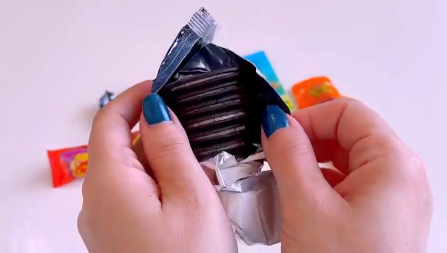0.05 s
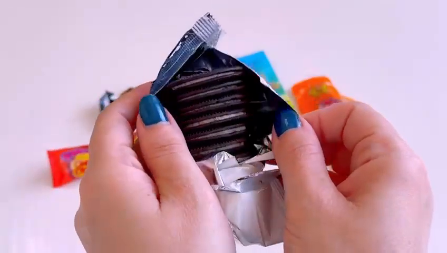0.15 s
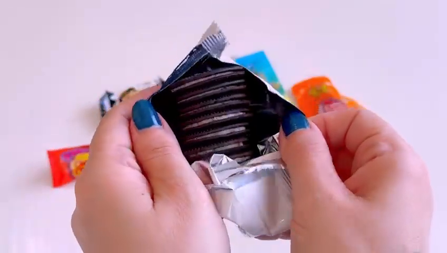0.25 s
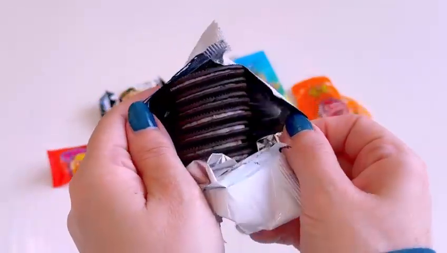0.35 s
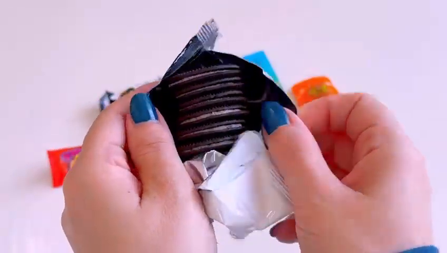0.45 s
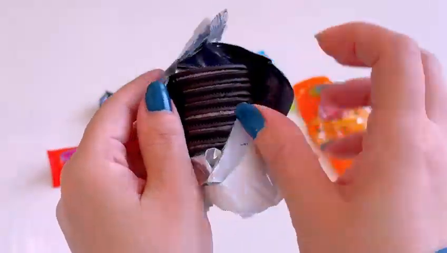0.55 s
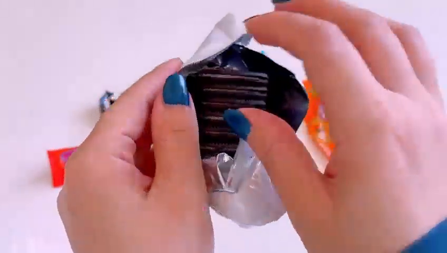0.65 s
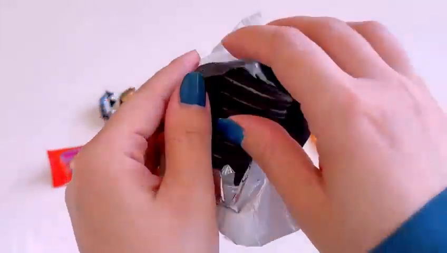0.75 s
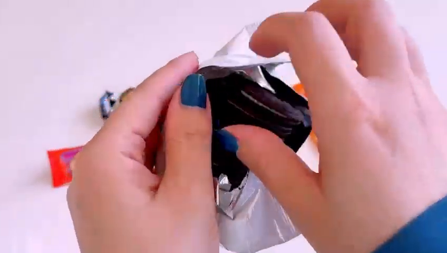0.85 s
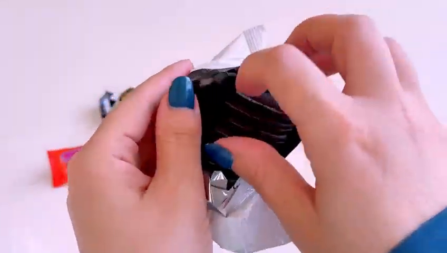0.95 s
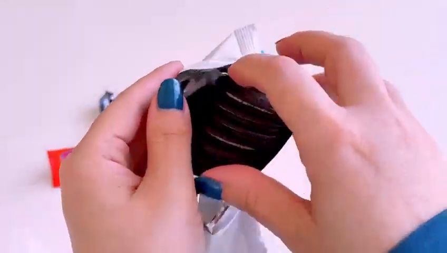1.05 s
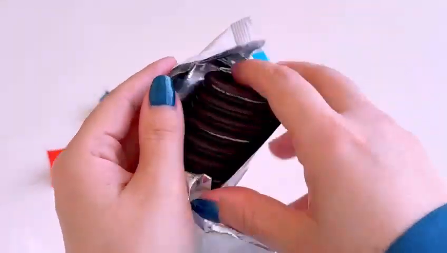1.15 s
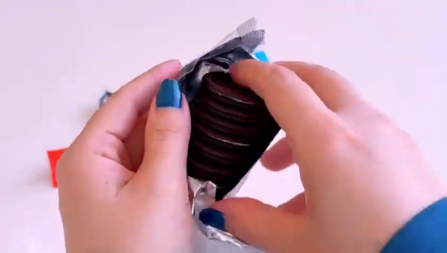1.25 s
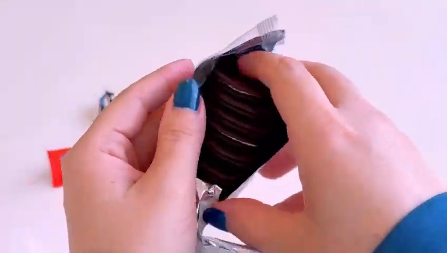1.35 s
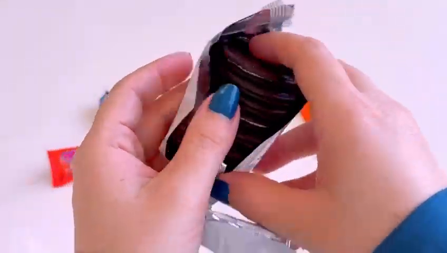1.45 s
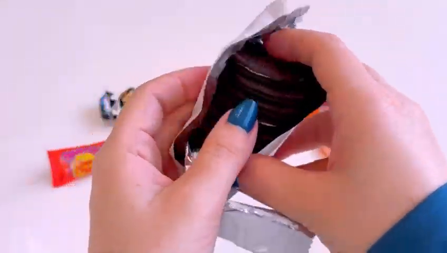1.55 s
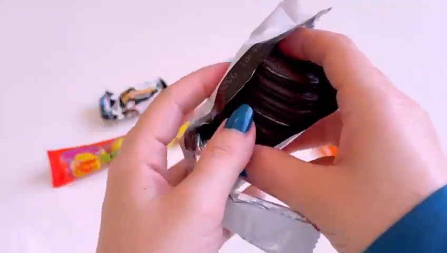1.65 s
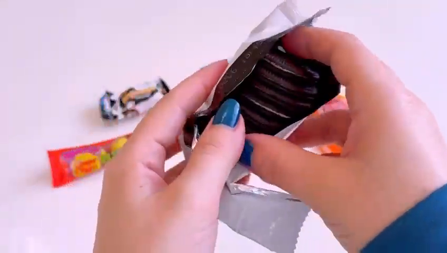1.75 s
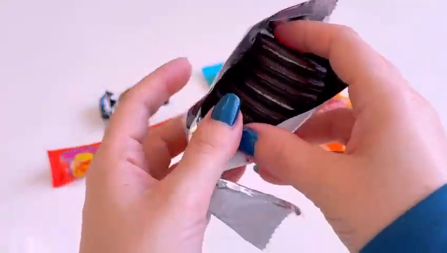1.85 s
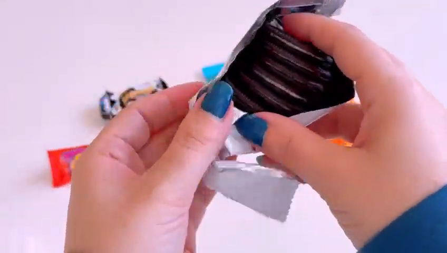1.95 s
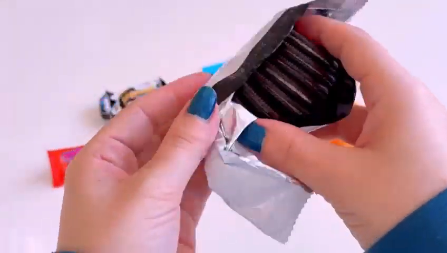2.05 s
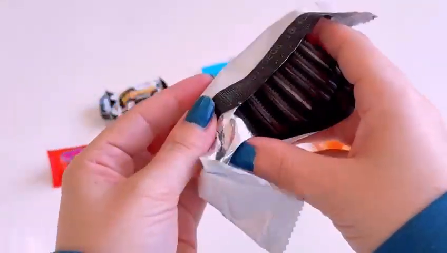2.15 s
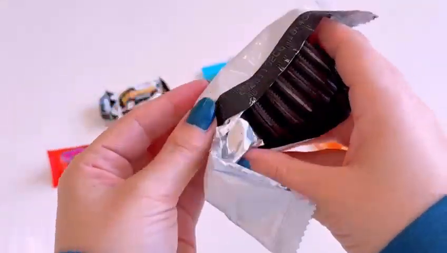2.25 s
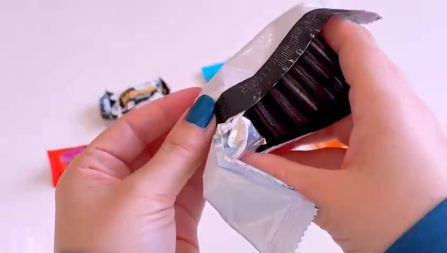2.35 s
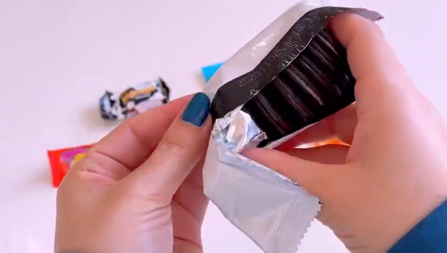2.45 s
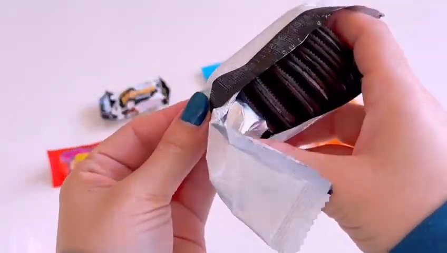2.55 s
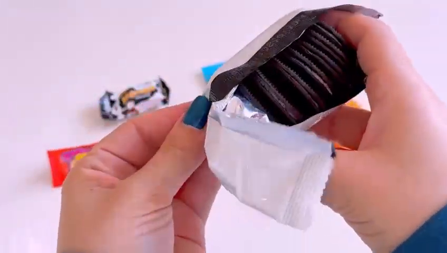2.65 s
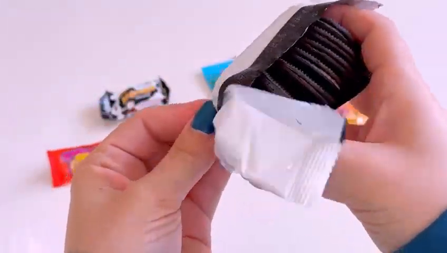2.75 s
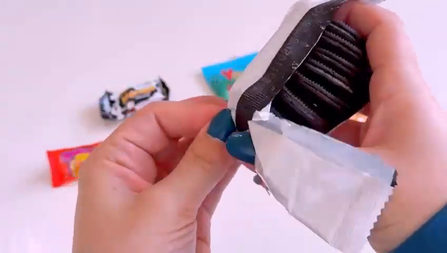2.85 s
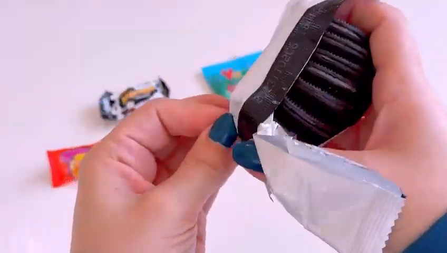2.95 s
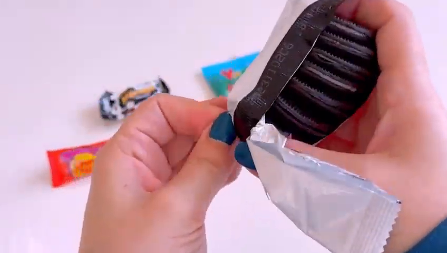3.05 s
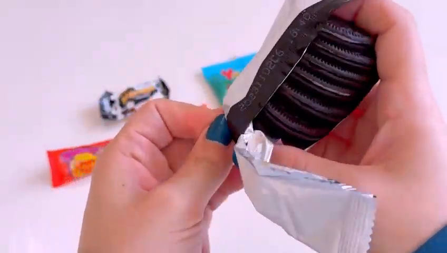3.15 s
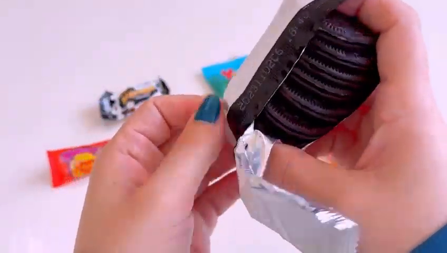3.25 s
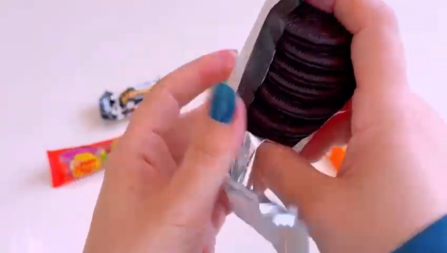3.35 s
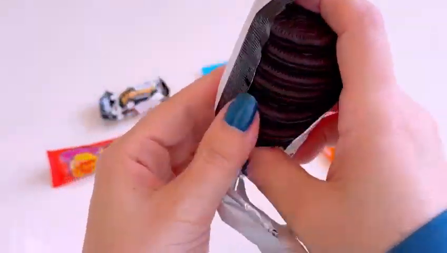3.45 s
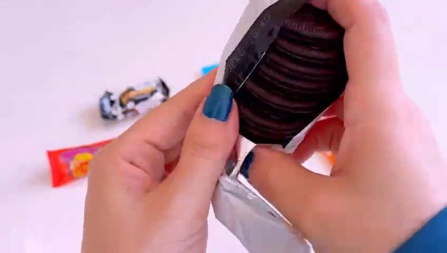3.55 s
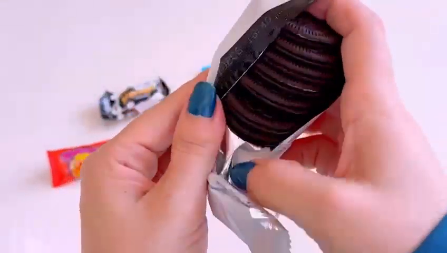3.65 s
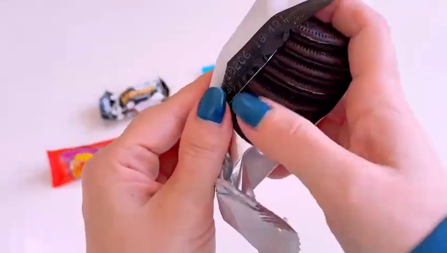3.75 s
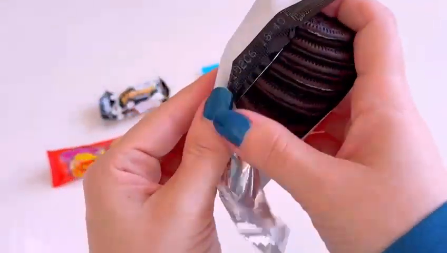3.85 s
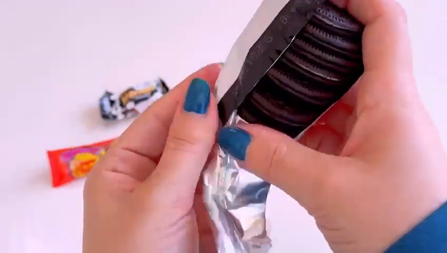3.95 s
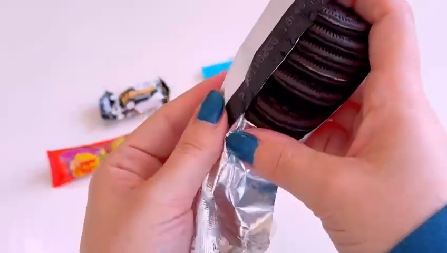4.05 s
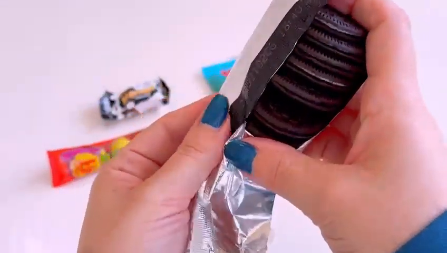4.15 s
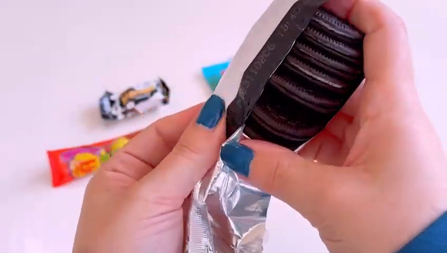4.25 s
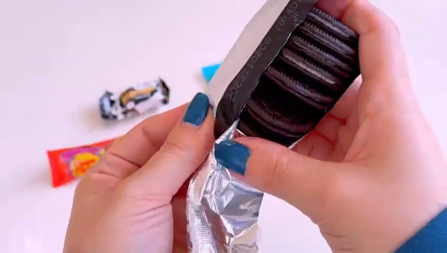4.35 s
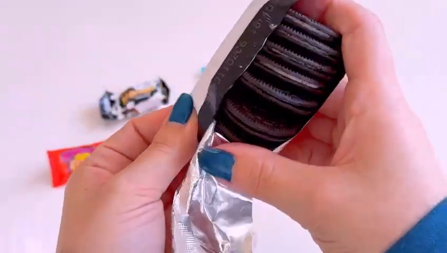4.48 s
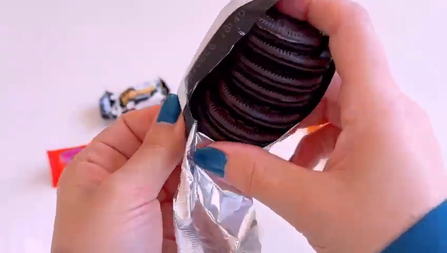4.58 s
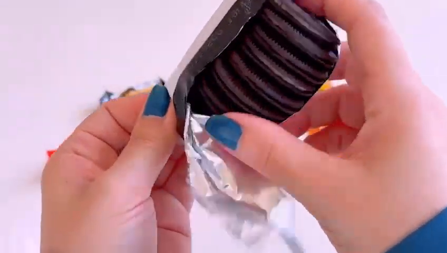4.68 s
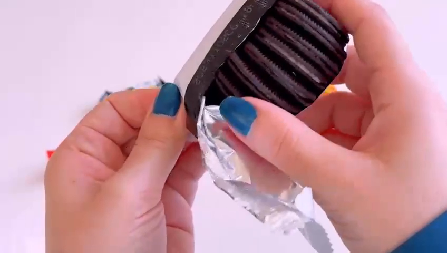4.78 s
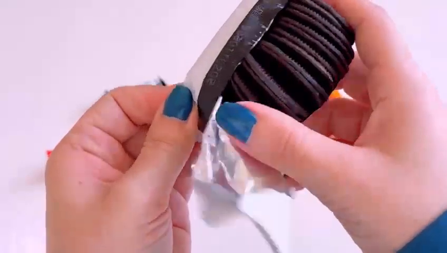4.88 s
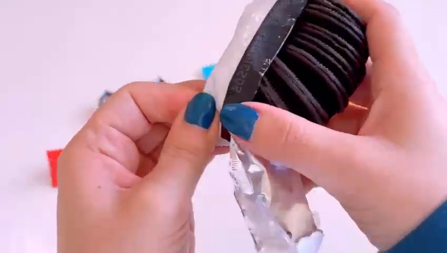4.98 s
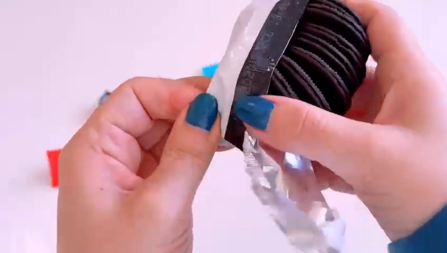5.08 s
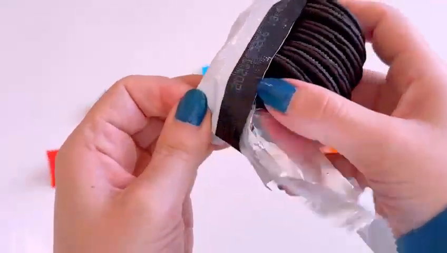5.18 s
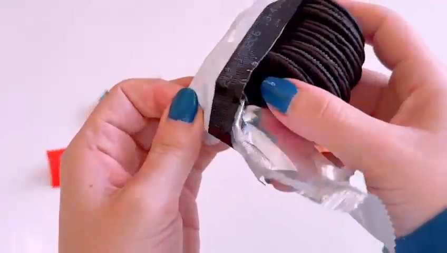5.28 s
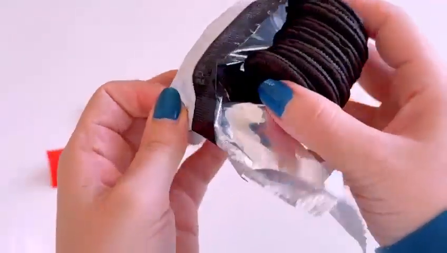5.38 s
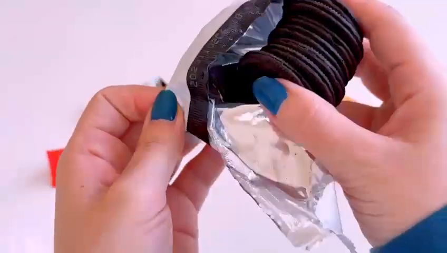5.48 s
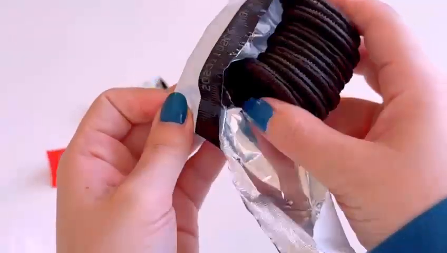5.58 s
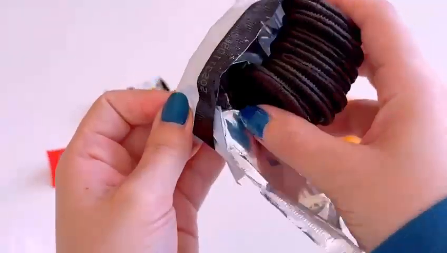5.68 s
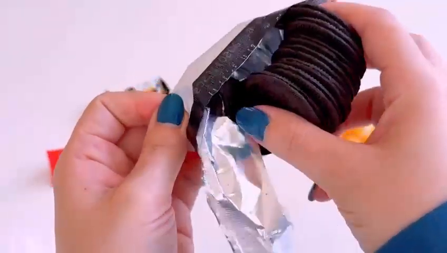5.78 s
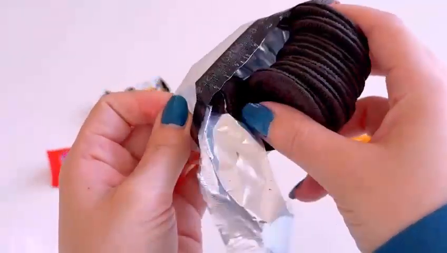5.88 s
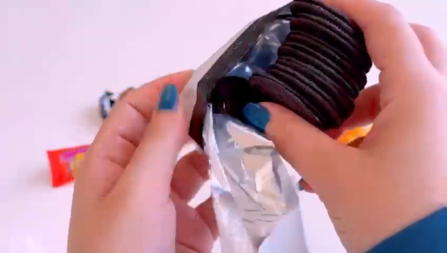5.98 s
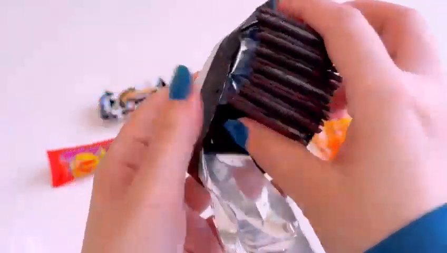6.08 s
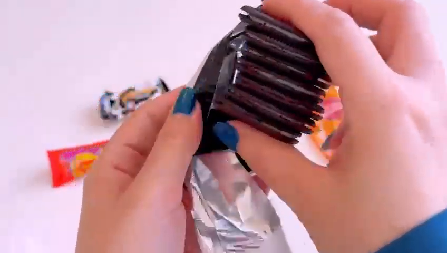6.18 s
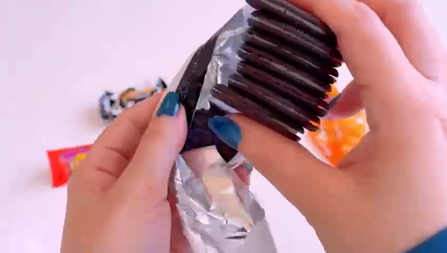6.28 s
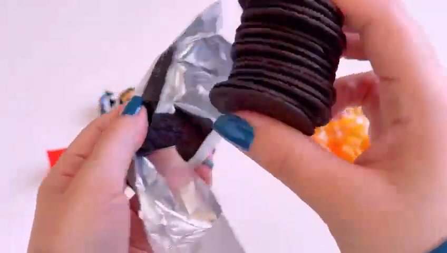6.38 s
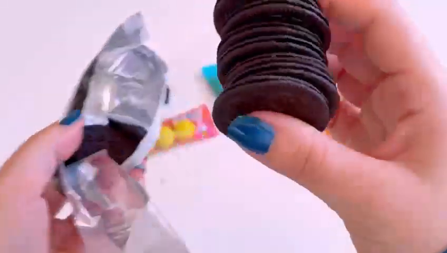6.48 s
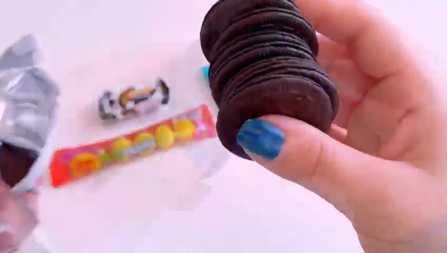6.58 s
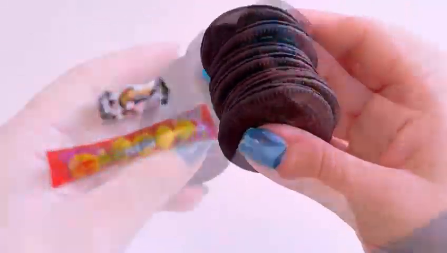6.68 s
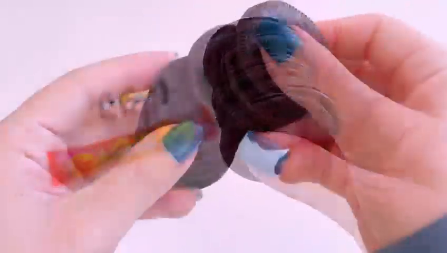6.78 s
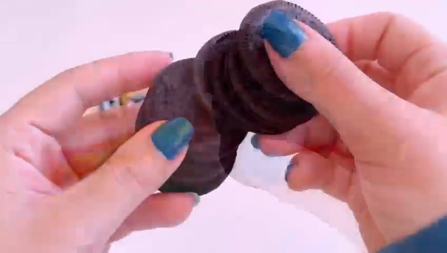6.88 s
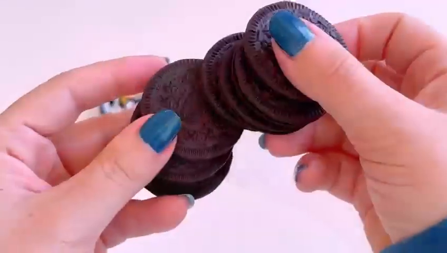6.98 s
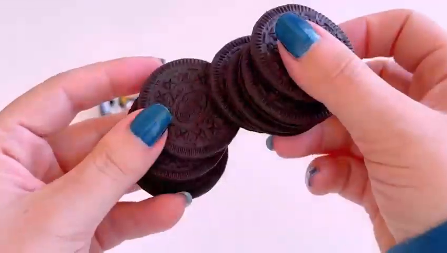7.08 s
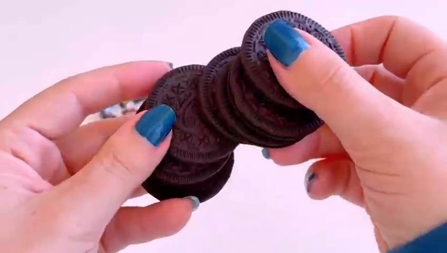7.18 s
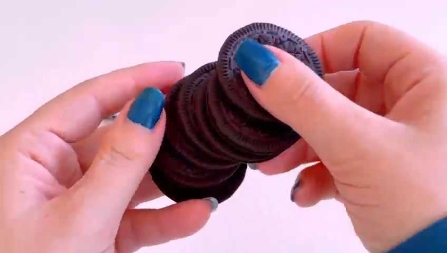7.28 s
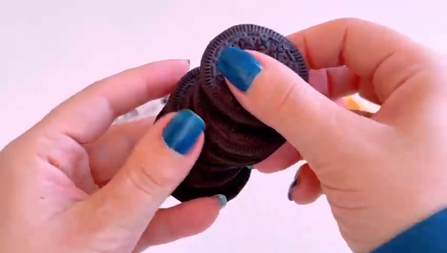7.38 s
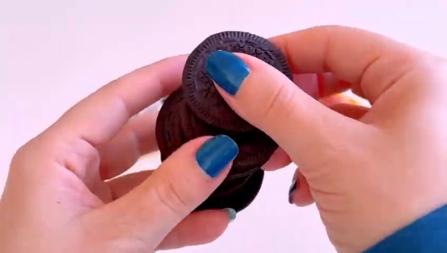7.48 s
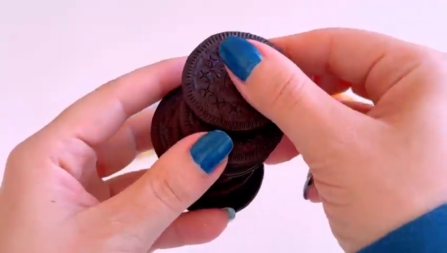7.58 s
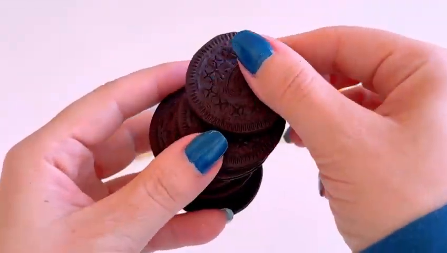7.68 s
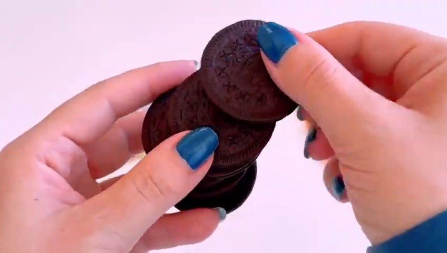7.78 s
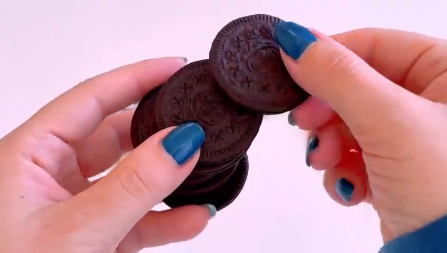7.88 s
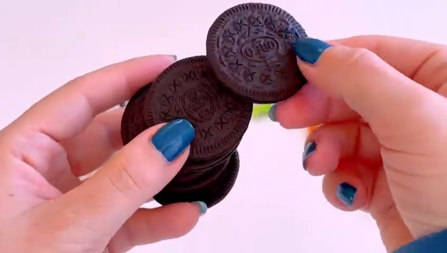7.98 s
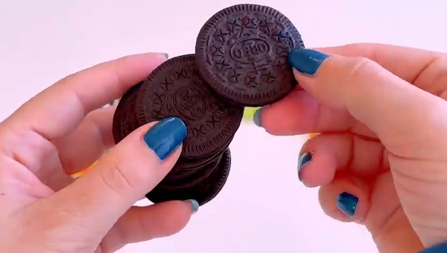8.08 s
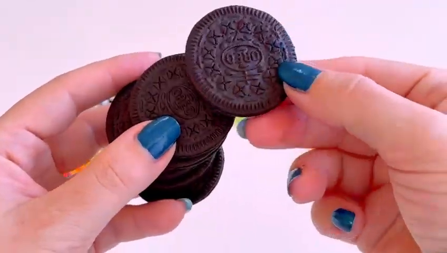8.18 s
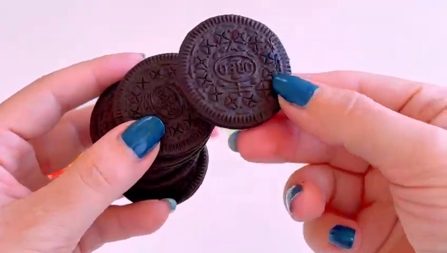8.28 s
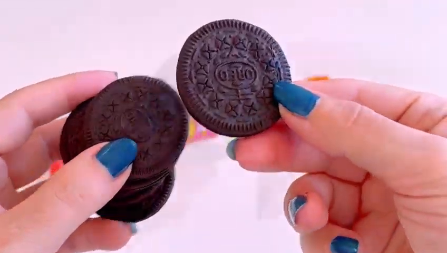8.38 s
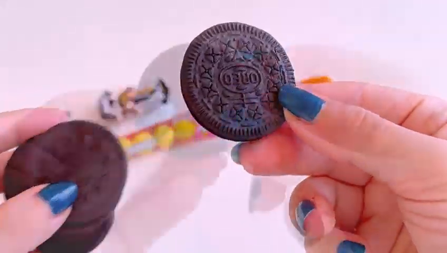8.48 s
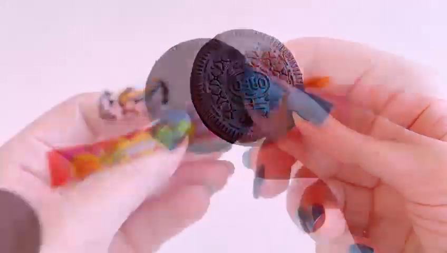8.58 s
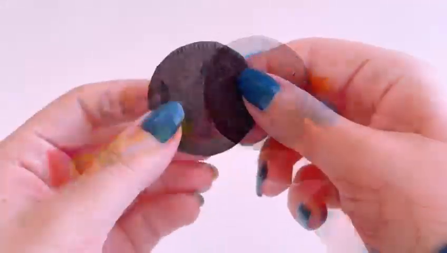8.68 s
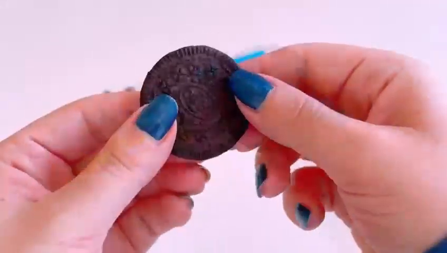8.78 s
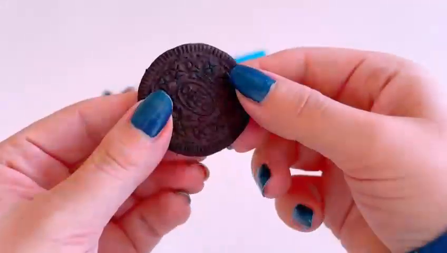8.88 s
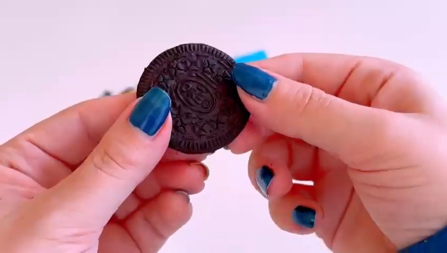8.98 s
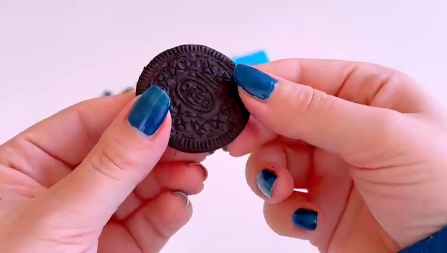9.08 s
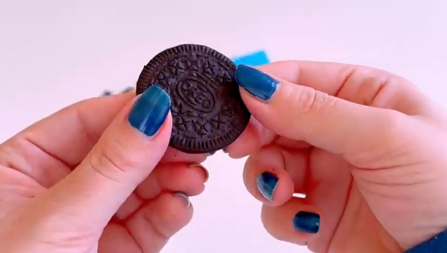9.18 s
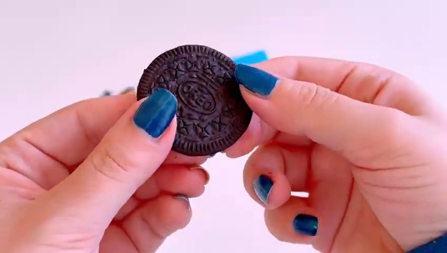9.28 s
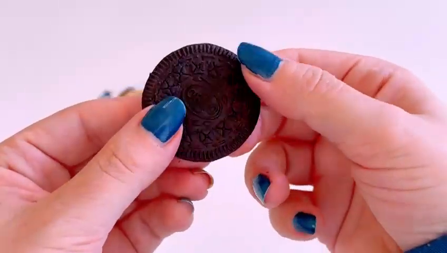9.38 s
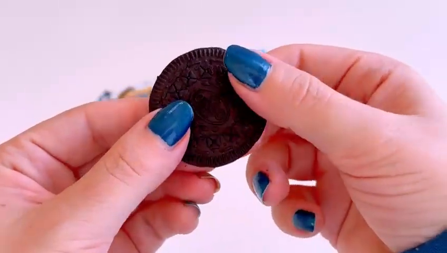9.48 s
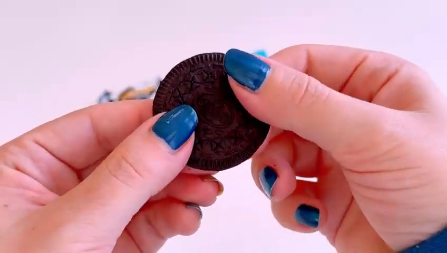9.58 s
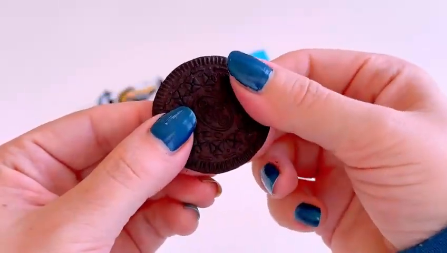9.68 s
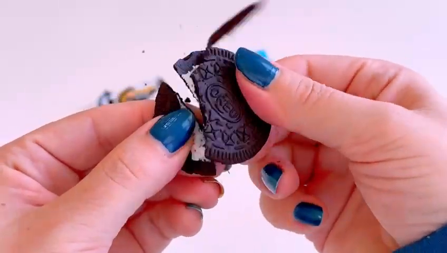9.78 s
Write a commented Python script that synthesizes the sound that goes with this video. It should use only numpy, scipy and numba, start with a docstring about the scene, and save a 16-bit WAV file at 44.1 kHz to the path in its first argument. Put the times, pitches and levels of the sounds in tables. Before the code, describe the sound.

Hands peel a foil-lined plastic wrapper off a stack of biscuits, close to the microphone. Creases snap in dense, uneven bursts over a fine rustle, with small hollow pops, for about six seconds. Then the biscuits slide apart with a much softer gritty rub, dry ticks and a few dull knocks. An arm faintly bumps the table now and then in a quiet room.

```python
"""A foil-lined plastic wrapper crackles close up as hands peel it off a stack of biscuits.
Creases snap through in short bursts over a fine rustle, and pockets of film pop hollow.
Then the biscuits slide apart with a soft gritty rub, dry ticks and a few dull knocks.
Arms bump the table now and then; a quiet room rumbles underneath."""
import sys
import numpy as np
from scipy import signal
from scipy.fft import rfft, irfft, next_fast_len
from scipy.io import wavfile
from scipy.ndimage import uniform_filter1d
from numba import njit

SR = 44100
rng = np.random.default_rng(int(sys.argv[2]) if len(sys.argv) > 2 else 0)


def dump(signal):
    """Clip the signal to [-1, 1] and save it as 16-bit WAV at the path in sys.argv[1]."""
    limited = np.clip(np.atleast_2d(signal).T, -1, 1)
    pcm = np.round(limited * 32767).astype(np.int16)
    wavfile.write(sys.argv[1], SR, pcm)


N = 433944

# room hiss tone: (frequency [Hz], gain [dB])
HISS_EQ = [(100, -15.5), (200, 1), (450, -4.5), (900, -11.5), (3000, -24), (11500, -43), (12500, -46.5)]
# rumble tone: (frequency [Hz], gain [dB])
RUMBLE_EQ = [(25, -22.5), (49, -3), (65, 1.5), (118, -2.5), (198, -14.5), (320, -48)]
# rumble through air and table: (time [s], level [dB])
RUMBLE_LEVELS = [(0, -78), (.57, -74), (1.38, -64), (1.9, -58), (2.42, -76.5), (3.2, -73), (4, -77),
                 (4.92, -74), (5.72, -76), (5.87, -66), (6.29, -81), (7.56, -68), (8.45, -67.5),
                 (8.55, -74.5), (9.84, -70)]
# arms bumping the table: (time [s], level [dB])
ARM_BUMPS = [(1.647, -43.5), (1.876, -57), (8.421, -65), (9.818, -47.5)]
# table top resonances: (frequency [Hz], decay by 60 dB [s])
TABLE_MODES = [(80, .45), (113, .3), (175, .12)]
# biscuits and skin sliding: (start [s], length [s], start level [dB], end level [dB])
BISCUIT_SLIDES = [(6.33, 0.16, -62.5, -68.5), (6.53, 0.14, -61.5, -75), (6.7, 0.058, -59, -65.5),
                  (6.81, 0.081, -64.5, -65), (6.93, 0.19, -69, -66), (7.18, 0.145, -66.5, -56.5),
                  (7.35, 0.36, -53.5, -72), (7.73, 0.06, -69.5, -60.5), (7.85, 0.041, -58, -57.5),
                  (7.92, 0.16, -66.5, -70.5), (8.4, 0.069, -84, -80), (8.61, 0.059, -79, -84),
                  (9.36, 0.058, -82, -83)]
# grit tone: (frequency [Hz], gain [dB])
GRIT_EQ = [(1400, -8), (2100, 0), (3200, -7), (5600, 0), (8600, -6), (11300, -4), (12500, -33)]
# dull biscuit knocks: (time [s], level [dB], pitch [Hz])
BISCUIT_KNOCKS = [(6.535, -39, 1073), (9.791, -47.5, 605), (9.795, -47, 286), (9.8125, -42, 830)]
# biscuits and nails touching: (time [s], level [dB], ring [Hz])
BISCUIT_TICKS = [(6.529, -32.5, 6960), (6.588, -41, 6100), (6.696, -50, 4000), (6.707, -45, 6000),
                 (6.713, -39, 4930), (6.7417, -46, 6400), (6.802, -36, 3260), (7.337, -24.5, 5640),
                 (7.681, -48, 7880), (9.3637, -56, 2890), (9.5757, -55, 5040), (9.7898, -24.5, 6100),
                 (9.8124, -23, 3300)]
# crackle and grit turn thin and full again: (time [s], cutoff [Hz])
LOW_CUT = [(0, 653), (.5, 280), (1, 176), (2.3, 149), (2.45, 710), (3.25, 680), (3.33, 295), (3.6, 486),
           (3.92, 1000), (4, 346), (4.5, 490), (4.62, 188), (4.85, 142), (4.95, 304), (5.75, 350),
           (5.85, 229), (6.5, 254), (6.95, 1340), (7.4, 750), (7.72, 1730)]
# held film shifting in the hands: (time [s], level [dB])
FILM_HOLD = [(0, -52.5), (.7, -55.5), (2.4, -53.5), (4.13, -53.5), (5.7, -48.5), (6.25, -54.5), (6.48, -64)]
# fingers pulling or crumpling film: (start [s], length [s], start level [dB], end level [dB])
FILM_PULLS = [(.15, 0.035, -69, -47), (.24, 0.037, -38, -40), (.33, 0.038, -49, -38),
              (.49, 0.11, -41, -41.5), (.79, 0.18, -44, -51), (1.06, 0.35, -45, -49.5),
              (1.35, 0.32, -45, -42.5), (1.8, .14, -47, -44), (1.98, 0.41, -45.5, -45),
              (2.45, 0.19, -40, -43), (2.69, 0.26, -45.5, -46), (3.0, 0.16, -36, -46),
              (3.29, 0.066, -38, -42.5), (3.39, 0.22, -45, -37.5), (3.66, 0.12, -46.5, -43),
              (3.85, 0.21, -45.5, -43), (4.18, 0.21, -46, -44), (4.44, 0.081, -44.5, -42.5),
              (4.62, 0.16, -43, -37.5), (4.82, 0.39, -54.5, -43.5), (5.33, 0.15, -37, -42),
              (5.77, 0.28, -36.5, -48.5), (5.98, 0.16, -44.5, -43), (6.15, 0.16, -45, -50)]
# pockets of film popping hollow: (time [s], level [dB], pitch [Hz])
FILM_POPS = [(.518, -38, 510), (.582, -33.5, 473), (.794, -29, 610), (1.885, -32, 854), (2.0, -26, 870),
             (2.4976, -25.5, 1020), (3.362, -43.5, 440), (4.723, -28, 1350), (4.773, -31.5, 646),
             (4.789, -25, 1240), (4.933, -32.5, 980), (5.068, -35.5, 585), (5.2885, -21, 1116),
             (5.80, -35, 500), (5.952, -30.5, 505)]
# creases that snap clearly: (time [s], level [dB], ring [Hz])
CREASE_SNAPS = [(0.118, -31, 3000), (0.1885, -30, 1200), (0.3045, -25, 6000), (0.3737, -21.0, 3960),
                (0.4555, -29, 2000), (0.48, -22.0, 7270), (0.5155, -22.0, 3080), (0.526, -27, 2800),
                (0.5445, -24, 7000), (0.5733, -22.0, 6220), (0.6035, -25, 5640), (0.7934, -10.5, 4800),
                (0.8437, -18.5, 3080), (1.0232, -21, 3060), (1.0653, -18.5, 6470), (1.168, -22.0, 1310),
                (1.2224, -23, 6160), (1.2702, -23.5, 5210), (1.2993, -22.5, 6070), (1.3342, -16.5, 8170),
                (1.3738, -23.0, 1410), (1.3837, -14.0, 2170), (1.3964, -19.5, 3330), (1.4135, -22.0, 1410),
                (1.4483, -21.0, 4550), (1.5311, -20.0, 2640), (1.5796, -21.5, 1160), (1.6198, -21.5, 6730),
                (1.6414, -22.5, 2010), (1.7301, -26, 1030), (1.8139, -23.5, 3570), (1.845, -24, 2900),
                (1.871, -15.0, 6990), (1.9028, -23.5, 7410), (1.913, -24, 3700), (1.9548, -24, 1380),
                (1.9999, -21.0, 4000), (2.101, -18.0, 2240), (2.1083, -19.5, 5120), (2.1358, -22.5, 2170),
                (2.2049, -16.5, 2260), (2.2141, -16.0, 5530), (2.3199, -21.0, 2740), (2.3816, -24, 4260),
                (2.4585, -15.0, 3460), (2.4976, -25, 4000), (2.5916, -21.5, 4210), (2.6283, -22.0, 6220),
                (2.6946, -14.0, 3080), (2.7173, -16.0, 7560), (2.7268, -11.5, 4000), (2.7594, -9.5, 6470),
                (2.7957, -18.5, 5320), (2.812, -21.5, 7560), (2.9249, -21.0, 2260), (3.0108, -12.0, 7560),
                (3.0186, -22.0, 1860), (3.0377, -18.5, 7560), (3.0554, -18.5, 7560), (3.0668, -22.0, 1260),
                (3.0773, -19.0, 5120), (3.2307, -21.0, 3330), (3.3027, -19.0, 2640), (3.3149, -21, 2090),
                (3.3333, -17.5, 2960), (3.3929, -10.0, 5980), (3.4186, -20.5, 7270), (3.4785, -22, 5860),
                (3.5181, -17.5, 1860), (3.5329, -13.0, 4550), (3.5638, -22.5, 2170), (3.6222, -22.0, 2170),
                (3.6615, -20.0, 1210), (3.6974, -20.5, 5750), (3.7075, -20.0, 2090), (3.7138, -18.5, 6730),
                (3.7263, -21.0, 5980), (3.7366, -16.5, 2090), (3.7443, -20.5, 6220), (3.7574, -16.5, 4050),
                (3.835, -17.0, 4050), (3.9252, -24, 6200), (3.9647, -23.0, 1360), (3.9795, -18.5, 4210),
                (3.9946, -18.0, 5980), (4.0031, -18, 5860), (4.008, -17.5, 2740), (4.0464, -25, 6550),
                (4.0933, -21.0, 7560), (4.1751, -24, 1940), (4.2193, -18, 7270), (4.2555, -26, 1500),
                (4.2698, -23, 3000), (4.2949, -22.0, 3890), (4.3307, -23, 2070), (4.3615, -18, 3000),
                (4.3762, -22.0, 2090), (4.3978, -18.0, 2260), (4.4863, -20.5, 4550), (4.5529, -20.5, 2170),
                (4.5674, -18.5, 6220), (4.5755, -11.5, 6990), (4.6369, -21.5, 5980), (4.6843, -21, 8270),
                (4.7, -20.5, 7860), (4.718, -20, 2500), (4.7213, -13.0, 5000), (4.7647, -21.5, 5320),
                (4.7728, -16.0, 5320), (4.7847, -15.5, 7860), (4.788, -20, 3500), (4.8145, -18.0, 6990),
                (4.885, -17.0, 2010), (4.9322, -18.5, 3210), (5.025, -16.5, 5120), (5.0605, -21.0, 5980),
                (5.0986, -19, 4050), (5.1037, -18.0, 7860), (5.1161, -19.5, 3890), (5.1373, -24, 4440),
                (5.1784, -21.0, 4050), (5.2044, -24, 1850), (5.288, -22, 6500), (5.3285, -21.0, 3080),
                (5.338, -21, 3000), (5.341, -9.5, 3300), (5.3938, -17.0, 5120), (5.4082, -17.0, 3890),
                (5.4215, -18, 3000), (5.5112, -18.0, 4730), (5.5808, -22.5, 2020), (5.605, -25, 4650),
                (5.6546, -17.5, 5320), (5.6795, -26, 5680), (5.7709, -16.5, 4050), (5.7792, -8.5, 6220),
                (5.8074, -16.0, 2010), (5.8161, -15.0, 6990), (5.8466, -22.5, 850), (5.8818, -19.5, 6730),
                (5.8958, -22.0, 1650), (5.9925, -14.5, 8100), (6.0005, -21.0, 5980), (6.0093, -12.5, 8170),
                (6.0345, -18.0, 6220), (6.071, -25, 1300), (6.0955, -24, 6000), (6.111, -23, 3000),
                (6.1267, -19, 5000), (6.131, -22, 3050), (6.2896, -25, 2200)]
# wrapper tone: (frequency [Hz], gain [dB])
FILM_EQ = [(150, 0), (500, -4), (1100, 2.5), (1700, 0.5), (5000, 0), (8000, 0.5), (11600, -3),
           (12600, -69.5)]
# stereo twist in the top octave: (frequency [Hz], phase lag of left behind right [turns])
PHASE_TWIST = [(8600, 0), (9050, .44), (10050, .56), (10500, .86), (11700, .9), (12000, 1.2), (12300, 1.5)]

TOP_HZ = 12500
GRAIN = 1024  # samples in one burst or pop


def undb(db):
    """Decibels to gain."""
    return 10 ** (np.asarray(db) / 20)


def unit(x):
    """Scale each channel to an RMS of 1."""
    return x / np.sqrt(np.mean(x ** 2, axis=-1, keepdims=True))


def curve(rows, outside=None):
    """A (time [s], value) table as a signal."""
    return np.interp(np.arange(N) / SR, *np.transpose(rows), left=outside, right=outside)


def colour(x, eq):
    """Equalise along (frequency [Hz], gain [dB]) points."""
    size = next_fast_len(N)
    hz, db = np.transpose(eq)
    gain = undb(np.interp(np.log(np.fft.rfftfreq(size, 1 / SR) + 1), np.log(hz), db))
    return irfft(rfft(x, size) * gain, size)[..., :N]


@njit
def highpass(x, hz):
    """State-variable high-pass with a moving cutoff."""
    y, band_state, low_state = np.empty(len(x)), 0., 0.
    for i in range(len(x)):
        g = np.tan(np.pi * hz[i] / SR)
        band = (band_state + g * (x[i] - low_state)) / (1 + g * (g + 1.2))
        y[i] = x[i] - 1.2 * band - low_state - g * band
        band_state, low_state = 2 * band - band_state, low_state + 2 * g * band
    return y


def thinned(x, bleed_db):
    """A steep moving low cut, with a little unfiltered sound mixed back in."""
    hz = curve(LOW_CUT)
    thin = np.array([highpass(highpass(highpass(ear, hz), hz), hz) for ear in x])
    return thin + undb(bleed_db) * x


def wander(rate_hz):
    """Glides between random values; spread near 1."""
    step = int(SR / rate_hz)
    return uniform_filter1d(np.repeat(rng.standard_normal(N // step + 1), step), step)[:N]


def specks(spread_db, size=32):
    """Gains of tiny grains: many small, few large."""
    return undb(spread_db * np.repeat(rng.exponential(size=N // size + 1), size)[:N])


def stereo_noise(side_db):
    """White noise, a centre plus a weaker side signal."""
    mid, side = rng.standard_normal((2, N))
    return mid + undb(side_db) * side * np.array([[1], [-1]])


def gestures(rows, rise_db_s, fall_db_s):
    """Gain of hand moves: each fades in, drifts from start to end level and dies; powers add."""
    t = np.arange(0, N / SR + .002, .001)
    start, length, first_db, last_db = np.transpose(rows)[..., None]
    db = first_db + (last_db - first_db) * np.clip((t - start) / length, 0, 1)
    db -= rise_db_s * np.maximum(start - t, 0) + fall_db_s * np.maximum(t - start - length, 0)
    return np.interp(np.arange(N) / SR, t, np.sqrt(np.sum(undb(db) ** 2, axis=0)))


def pops(rows, rise_cycles=1.2):
    """Hollow pops: a few cycles of one slightly detuned pitch swell and die."""
    when, level_db, hz = np.transpose(rows)[..., None]
    cycles = np.arange(GRAIN) / SR * hz * undb(0.66 * rng.standard_normal(when.shape))
    swell = (cycles / rise_cycles * np.exp(1 - cycles / rise_cycles)) ** 2
    ring = undb(level_db) * swell * np.sin(2 * np.pi * cycles)
    place = ((when - rise_cycles / hz) * SR).astype(int) + np.arange(GRAIN)
    return np.bincount(place.ravel(), ring.ravel(), N + GRAIN)[:N]


def bursts(rows, rise_ms, fall_ms, ring_db, body_db, body_ms, side_db=-16):
    """Ragged cracks that ring their own patch briefly, then thump the hollow body."""
    when, level_db, ring_hz = np.transpose(rows)[..., None]
    lead = GRAIN // 4
    ms = (np.arange(GRAIN) - lead) / SR * 1000
    hz = np.fft.rfftfreq(GRAIN, 1 / SR) + 1
    mid, side, body, traits = rng.standard_normal((len(when), 4, GRAIN)).swapaxes(0, 1)
    stretch, brightness, weight = traits.T[:3, :, None]  # each burst has its own character
    width_ms = np.where(ms < 0, rise_ms, fall_ms) * undb(1.5 * stretch)
    envelope = np.exp(-(np.abs(ms) / width_ms) ** 1.5)
    breadth = (3000 / ring_hz) ** .5  # broad, low patches ring and thump more
    ring = 1 + undb(ring_db) * breadth * np.exp(-(np.log(hz / ring_hz) / 0.14) ** 2)
    tilt = (hz / 3000) ** (0.14 * brightness + 0.27 * np.log(ring_hz / 2500))  # high rings are brighter
    tone = ring * tilt * (hz < TOP_HZ) / (1 + (650 / hz) ** 2)
    mid, side = (irfft(rfft(noise * envelope) * tone) for noise in (mid, side))
    peak = np.abs(mid).max(axis=1, keepdims=True)

    body = body * np.maximum(ms, 0) * np.exp(-np.abs(ms) / body_ms)
    body_hz = 600 * undb(6.2 * brightness)
    body = irfft(rfft(body) * np.exp(-(np.log(hz / body_hz) / 0.66) ** 2))
    body *= undb(body_db + 4.1 * weight) * breadth / np.abs(body).max(axis=1, keepdims=True)

    place = ((when * SR).astype(int) + np.arange(GRAIN)).ravel()
    ears = []
    for spread in (undb(side_db), -undb(side_db)):
        grains = undb(level_db) * (body * (1 + spread * stretch) + (mid + spread * side) / peak)
        ears.append(np.bincount(place, grains.ravel(), N + GRAIN)[lead:lead + N])
    return np.array(ears)


def room():
    """A bed of faint, even hiss over a rumble that swells."""
    rumble = unit(colour(stereo_noise(side_db=-19), RUMBLE_EQ))
    rumble *= undb(curve(RUMBLE_LEVELS) + 2.0 * wander(7.4))
    hiss = unit(colour(stereo_noise(side_db=-6), HISS_EQ)) * undb(-78)
    return rumble + hiss


def reflections(x, t60_s, wet_db):
    """Table top and near walls add a short diffuse tail."""
    t = np.arange(int(t60_s * SR)) / SR
    tail = rng.standard_normal((2, SR))[:, :len(t)] * 1000 ** (-t / t60_s) * (t > .002)
    tail = tail[0] + 0.16 * tail  # nearly mono
    tail /= np.sqrt(np.sum(tail ** 2, axis=1, keepdims=True))
    return x + undb(wet_db) * signal.fftconvolve(x, tail, axes=1)[:, :N]


def table_bumps():
    """The table top booms briefly when an arm bumps it."""
    when, level_db = np.transpose(ARM_BUMPS)
    blows = np.bincount((when * SR).astype(int), undb(level_db), N)
    t = np.arange(SR // 2) / SR
    boom = sum(np.sin(2 * np.pi * hz * t) * 1000 ** (-t / t60) for hz, t60 in TABLE_MODES)
    return signal.fftconvolve(blows, boom)[:N]


def biscuits():
    """Fine grit of biscuit rubbing on biscuit and skin, with knocks and dry ticks on contact."""
    slide = gestures(BISCUIT_SLIDES, rise_db_s=600, fall_db_s=450)
    slide = np.hypot(slide, undb(-91.5))  # a trace of grit stays between slides
    crumbs = specks(1.5) * undb(2.1 * wander(70))
    grit = unit(colour(stereo_noise(side_db=-34) * crumbs, GRIT_EQ)) * slide
    ticks = bursts(BISCUIT_TICKS, rise_ms=0.65, fall_ms=2.0, ring_db=2.5, body_db=-50, body_ms=0.7)
    ticks = colour(ticks, [(500, 9.5), (1400, 2.0), (11300, -0.5), (12500, -51)])
    return thinned(grit, bleed_db=-10.5) + pops(BISCUIT_KNOCKS) + ticks


def wrapper(small_creases=1800):
    """Creases snap and pockets pop, over a swarm of small snaps and a rustle that follow the hands."""
    snaps = bursts(CREASE_SNAPS, rise_ms=0.6, fall_ms=0.95, ring_db=3, body_db=-22, body_ms=1.4)
    pull = gestures(FILM_PULLS, rise_db_s=603, fall_db_s=399.5)
    hold = undb(curve(FILM_HOLD, outside=-200))
    grip_db = 20 * np.log10(np.hypot(pull, hold))

    position, chance, pitch, _ = rng.random((small_creases, 4)).T
    when = position * CREASE_SNAPS[-1][0]
    accent_db = 1.5 + np.minimum(-5.5 * np.log(chance + 1e-9), 11)  # many faint creases, few strong
    level_db = grip_db[(when * SR).astype(int)] + accent_db
    creases = np.transpose([when, level_db, 1500 * 6 ** pitch])
    swarm = bursts(creases, rise_ms=0.49, fall_ms=0.9, ring_db=0.5, body_db=-14.5, body_ms=1.27)

    rustle = stereo_noise(side_db=-25.5)
    pull_flutter = pull * undb(-6.5 + 4.9 * wander(120)) * specks(2.16)
    hold_flutter = hold * undb(0.5 + 2.0 * wander(34))
    rustle *= np.hypot(pull_flutter, hold_flutter)
    # one small crease in eight frees a pocket of air
    pockets = pops(np.transpose([when + .03, level_db - 9.5, 300 * 2.1 ** pitch])[::8])
    crackle = colour(snaps + swarm + rustle + pockets, FILM_EQ)
    return thinned(crackle, bleed_db=-16.5) + pops(FILM_POPS)


def scene():
    """Wrapper and biscuits up front in a tight space, over table bumps and room tone."""
    return reflections(wrapper() + biscuits(), t60_s=.07, wet_db=-17) + table_bumps() + room()


def record(dry):
    """Twist the two channels' phase apart in the top octave, then cut the highs steeply."""
    size = next_fast_len(N)
    lag = np.pi * np.interp(np.fft.rfftfreq(size, 1 / SR), *np.transpose(PHASE_TWIST))
    twisted = irfft(rfft(dry, size) * np.exp(1j * np.array([-lag, lag])), size)[:, :N]
    return signal.sosfilt(signal.ellip(8, .2, 70, TOP_HZ, fs=SR, output="sos"), twisted)


dry = scene()
out = record(dry)
dump(out)
```